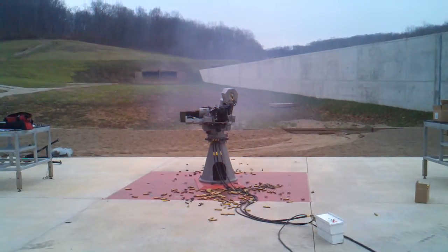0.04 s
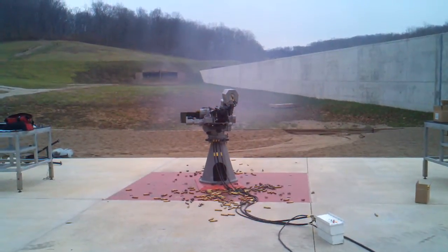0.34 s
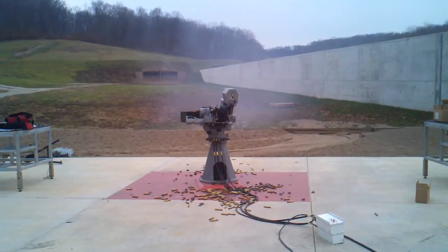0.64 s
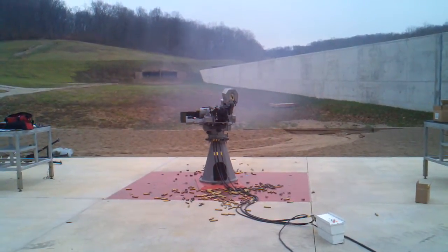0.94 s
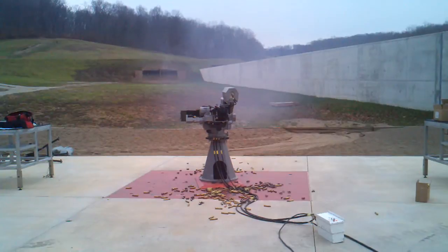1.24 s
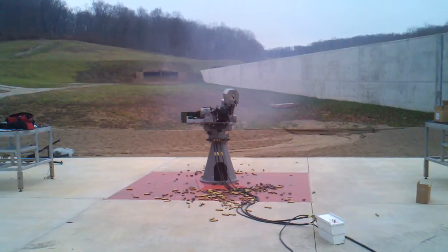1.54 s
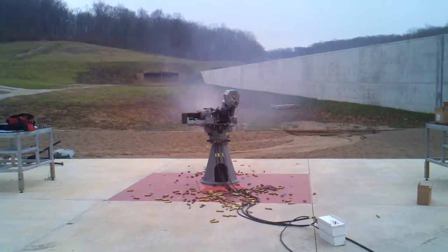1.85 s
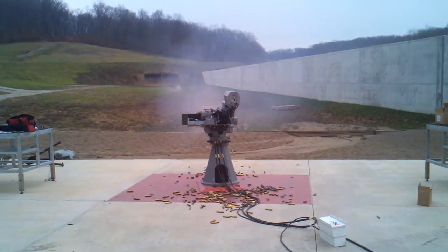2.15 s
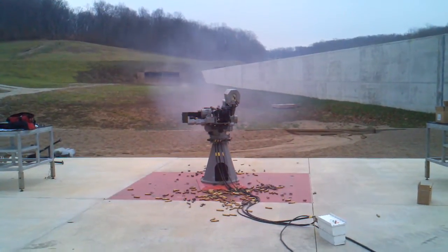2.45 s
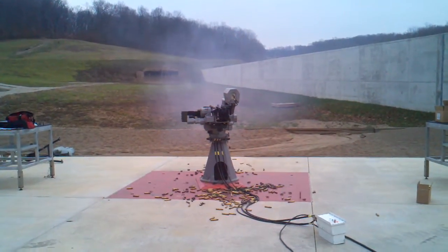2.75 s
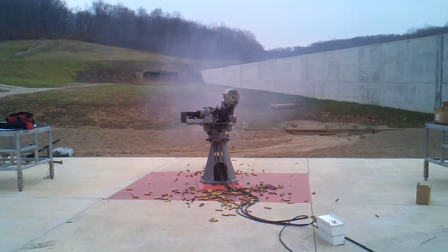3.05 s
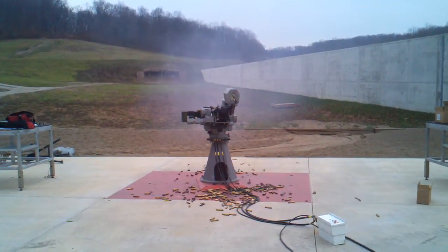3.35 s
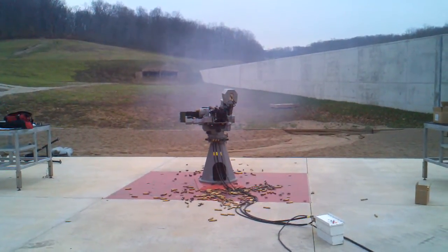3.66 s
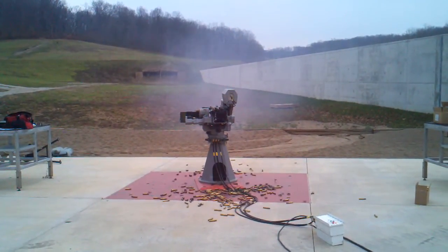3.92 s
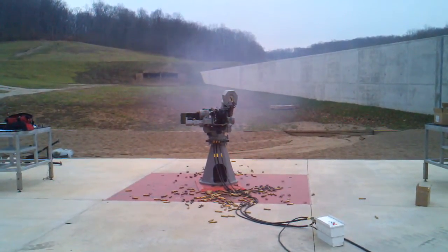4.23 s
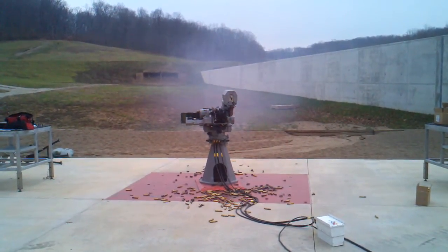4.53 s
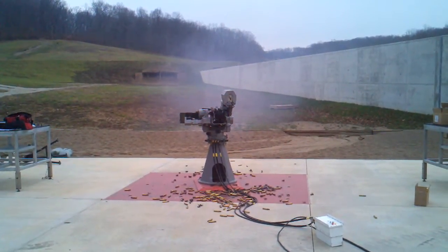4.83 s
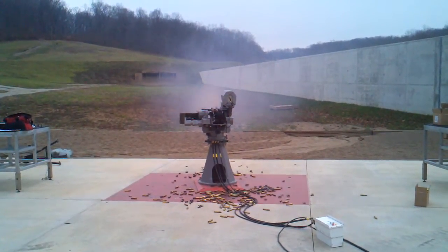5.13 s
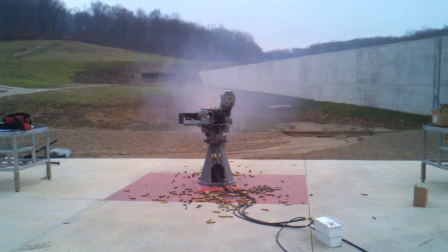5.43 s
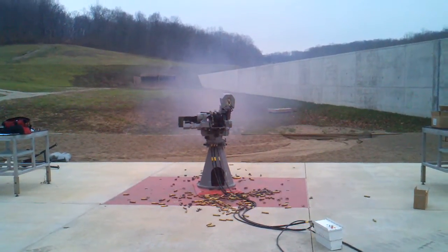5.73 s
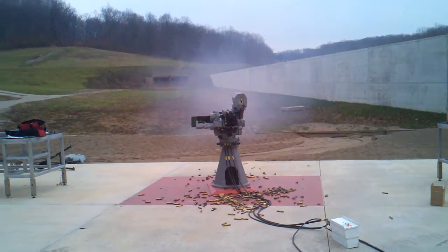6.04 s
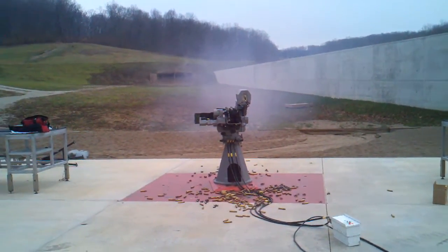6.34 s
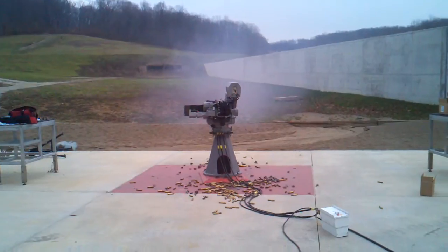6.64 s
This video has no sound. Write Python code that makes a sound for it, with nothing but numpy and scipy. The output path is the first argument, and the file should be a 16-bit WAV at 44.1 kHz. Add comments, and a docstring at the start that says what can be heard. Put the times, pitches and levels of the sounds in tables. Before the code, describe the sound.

Two loud five-round machine gun bursts at an open range, each followed by tinkling shell cases, far thuds and fading echoes.

```python
"""Outdoor range: faint air murmur and a thin whine. A heavy machine gun on a pedestal clacks and fires
five rounds; each blast cracks, then roars between the concrete pad and a long wall. The rounds thud into
a far backstop, a grassy slope answers, brass cases ring and hop on the concrete, and a wooded ridge rolls
the sound back. A second five-round burst follows about 3 s after the first. The camera's limiter
flattens both bursts and its stereo widener hollows the middle."""
import sys
import numpy as np
from scipy import signal
from scipy.fft import rfft, irfft
from scipy.io import wavfile
from scipy.ndimage import uniform_filter1d

SR = 44100
rng = np.random.default_rng(int(sys.argv[2]) if len(sys.argv) > 2 else 0)


def transcribe(u):
    """Save the signal u as a 16-bit wav file named by the first command-line argument.

    u: samples, shape (n,) or (channels, n), limited to [-1, 1]; the rate is SR.
    q: integer samples, one column per channel.
    """
    v = np.clip(np.atleast_2d(u).T, -1, 1)
    q = np.round(v * 32767).astype(np.int16)
    wavfile.write(sys.argv[1], SR, q)


N = 294588
TIME_S = np.arange(N) / SR
BIN_HZ = np.arange(N // 2 + 1) * SR / N


def from_db(db):
    """Decibels to gain."""
    return 10 ** (np.asarray(db) / 20)


def at_bins(table):
    """Table interpolated at each FFT bin, log-frequency axis."""
    hz, value = np.transpose(table)
    return np.interp(np.log(np.maximum(BIN_HZ, 1)), np.log(hz), value)


def unit_rms(x):
    """Scale to rms 1."""
    return x / np.sqrt(np.mean(x ** 2) + 1e-20)


def cut(x, hz, kind, order=2):
    """Butterworth low-pass or high-pass."""
    return signal.sosfilt(signal.butter(order, hz, kind, fs=SR, output="sos"), x)


def drift(rate_hz):
    """Smooth random curve, rms 1."""
    pole = np.exp(-2 * np.pi * rate_hz / SR)
    return unit_rms(signal.lfilter([1], [1, -2 * pole, pole * pole], rng.standard_normal(N)))


def noise(spectrum, correlation, lumps_db=0, resonances=()):
    """Coloured stereo noise, rms 1; level lumps stand for single prominent reflections."""
    peaks_db = sum(db / (1 + (2 * (BIN_HZ - hz) / width_hz) ** 2) for hz, width_hz, db in resonances)
    mid, side = rfft(rng.standard_normal((2, N))) * from_db(at_bins(spectrum) + peaks_db)
    alike = np.clip(at_bins(correlation), -1, 1)
    pair = np.sqrt(1 + alike) * mid + np.sqrt(1 - alike) * side * [[1], [-1]]
    return unit_rms(irfft(pair, N) * from_db(lumps_db * drift(36)))


def ring(drive, hz, t60_s):
    """One mode: a unit click starts a decaying sine of height 1."""
    pole = from_db(-60 / (t60_s * SR))
    angle = 2 * np.pi * hz / SR
    return signal.lfilter([0, np.sin(angle)], [1, -2 * pole * np.cos(angle), pole * pole], drive + 1e-18)


def thumps(starts_s, levels_db, low_hz, high_hz):
    """Blows through a broad resonance, a few cycles each."""
    blows = np.zeros(N)
    blows[(starts_s * SR).astype(int)] = from_db(levels_db)
    band = signal.butter(2, [low_hz, high_hz], "band", fs=SR, output="sos")
    return signal.sosfilt(band, blows + 1e-18) * SR / (np.pi * (high_hz - low_hz))


def puffs(starts_s, levels_db, rise_s, t60_s):
    """Envelope of blows that rise and decay; powers add."""
    power = np.zeros(N)
    for start_s, db in zip(starts_s, levels_db):
        start = int(start_s * SR)
        age_s = TIME_S[:N - start][:SR]
        blow = from_db(db - 60 * age_s / t60_s) * np.minimum(age_s / rise_s, 1)
        power[start:start + len(age_s)] += blow ** 2
    return np.sqrt(power)


# left/right likeness of far sound: freq_hz, correlation
FAR_STEREO = [(60, 0.45), (170, 0.37), (600, 0.53), (1500, .1), (4000, 0.079), (10000, 0.1)]
# air spectrum: freq_hz, density_db
AIR_SPECTRUM = [(25, -32.5), (50, -34.5), (100, -2.5), (160, 0.5), (400, 3), (650, -1), (900, -6.5),
                (1200, -12.5), (1800, -20), (3000, -26), (5500, -33), (9000, -27), (14000, -31)]
# whine tones: pitch_hz, rms_db
WHINE_TONES = [(8861, -84), (9076, -82), (9119, -107), (9372, -79.5)]


def background():
    """Distant murmur of air and a thin, wavering whine."""
    whine = sum(from_db(db) * unit_rms(ring(rng.standard_normal(N), hz, t60_s=0.12))
                for hz, db in WHINE_TONES)
    return from_db(-54.5) * noise(AIR_SPECTRUM, FAR_STEREO, lumps_db=0.6) + whine


# feed and bolt clacks: start_s, level_db
ACTION_CLACKS = [(1.668, -56), (1.701, -52), (1.742, -52), (1.771, -33.5), (1.787, -21), (4.907, -47),
                 (4.924, -30), (4.931, -14)]
# steel receiver resonances: centre_hz, width_hz, gain_db
RECEIVER_MODES = [(1400, 430, 15.5), (3200, 180, 9.5), (3870, 200, 11), (6440, 900, 10), (8900, 900, 11)]
# clack and muzzle crack spectrum: freq_hz, density_db
CRACK_SPECTRUM = [(40, 12.5), (150, -6), (600, 4.5), (1500, -2), (3500, 0.5), (5000, -7), (8000, -3.5),
                  (14000, -2.5)]
# left/right likeness of sound from ahead: freq_hz, correlation
AHEAD_STEREO = [(100, 0.97), (1500, 0.34), (8000, 0.47)]


def gun_action():
    """Feed and bolt move before each burst and ring the receiver."""
    clacks = puffs(*np.transpose(ACTION_CLACKS), rise_s=0.00038, t60_s=0.03)
    return clacks * noise(CRACK_SPECTRUM, AHEAD_STEREO, resonances=RECEIVER_MODES)


# rounds fired: start_s, blast_db, extra_crack_db
ROUNDS = [(1.792, 0, 2), (1.902, -1.5, -2), (2.011, 0, -0.5), (2.122, -3, 3), (2.24, -2.5, -3.5),
          (4.933, -1, 1.5), (5.046, 0, -2), (5.151, -2.5, 1.5), (5.276, -3, -1.5), (5.412, -2.5, -4)]
# left/right likeness of the blast: freq_hz, correlation
BLAST_STEREO = [(60, -1.065), (170, -0.68), (330, -0.22), (600, 0.38), (1200, -0.2), (3000, -0.021),
                (8000, -0.01)]


def muzzle_crack():
    """A broadband crack leaves the muzzle with each round."""
    start_s, blast_db, extra_crack_db = np.transpose(ROUNDS)
    cracks = puffs(start_s, blast_db + extra_crack_db - 2, rise_s=0.0054, t60_s=0.2)
    return cracks * noise(CRACK_SPECTRUM, BLAST_STEREO, lumps_db=3.5)


def after_shots(db, rise_s, t60_s, hold_s=0, delay_s=0):
    """Rise-hold-decay envelope set off by every round; powers add."""
    age_s = TIME_S - delay_s
    decay_db = 60 * np.maximum(age_s - rise_s - hold_s, 0) / t60_s
    response = np.clip(age_s / rise_s, 0, 1) * from_db(db - decay_db)
    start_s, blast_db, _ = np.transpose(ROUNDS)
    shots = np.zeros(N)
    shots[(start_s * SR).astype(int)] = from_db(blast_db)
    power = signal.fftconvolve(shots ** 2, response ** 2)[:N]
    return np.sqrt(np.maximum(power, 0))


# roar spectra by band: freq_hz, density_db
ROAR_BASS_SPECTRUM = [(20, -24), (50, -14), (90, -4.5), (130, -3), (180, 3.5), (260, -1), (340, 3),
                      (520, -19), (1200, -62)]
ROAR_MID_SPECTRUM = [(120, -53), (220, -18.5), (310, -1.5), (430, 3), (600, 1), (850, -3.5), (1300, -3),
                     (2000, -4.5), (3000, -10.5), (4500, -22), (9000, -28.5)]
ROAR_TREBLE_SPECTRUM = [(1000, -24.5), (2200, -31), (3400, 2.5), (5000, -1), (7500, 4.5), (10000, 2.5),
                        (14000, -3.5)]
# firing point resonances: centre_hz, width_hz, gain_db
SITE_MODES = [(179.4, 27, 3.5), (266.4, 17, 7), (425.4, 33, 4), (757.6, 17, 6), (805, 40, 4),
              (906, 28, 5.5), (1124, 7.1, 3.5), (1687, 28, 2), (3440, 59, 1), (6500, 36, 3.5)]


def roar(slap_delay_s=0.121, top_hz=10000):
    """The blast between pad and wall dies fast; the wall slaps back and the range rings on."""
    start_s, blast_db, _ = np.transpose(ROUNDS)
    blast = after_shots(0, rise_s=0.015, t60_s=0.34, hold_s=0.029)
    slap = puffs(start_s + slap_delay_s, blast_db - 9, rise_s=0.0043, t60_s=0.11)
    bass = np.hypot(from_db(-10) * blast, after_shots(-11, rise_s=0.051, t60_s=1.13))
    mid = np.hypot(from_db(-5.5) * blast, after_shots(-15, rise_s=0.051, t60_s=1.707))
    treble = after_shots(-15.5, rise_s=0.0073, t60_s=0.66, hold_s=0.069)
    top = after_shots(-14.5, rise_s=0.0073, t60_s=0.42, hold_s=0.069)  # air absorbs the top sooner
    hiss = noise(ROAR_TREBLE_SPECTRUM, BLAST_STEREO, resonances=SITE_MODES)
    bass_noise = noise(ROAR_BASS_SPECTRUM, BLAST_STEREO, lumps_db=1.5, resonances=SITE_MODES)
    mid_noise = noise(ROAR_MID_SPECTRUM, BLAST_STEREO, lumps_db=1.5, resonances=SITE_MODES)
    return (bass * bass_noise
            + np.hypot(mid, slap) * mid_noise
            + treble * cut(hiss, top_hz, "low", order=3)
            + top * cut(hiss, top_hz, "high", order=3))


# strong wall echoes: start_s, level_db
WALL_ECHOES = [(1.926, -2.5), (2.275, -26), (2.366, -5.5), (5.398, -13), (5.543, -7.5), (5.613, -20)]


def wall_echoes():
    """Single reflections off the wall arrive as low thumps."""
    return thumps(*np.transpose(WALL_ECHOES), low_hz=290, high_hz=400)


# rounds landing: start_s, boom_db, knock_db, crack_db
BACKSTOP_HITS = [(2.529, -16.5, -12.5, -19.5), (2.656, -18.5, -27, -36), (2.765, -29, -18, -13),
                 (2.873, -24.5, -31, -37.5), (2.994, -23, -24.5, -42), (5.697, -18.5, -33, -30),
                 (5.793, -16, -10, -18), (5.937, -27, -7.5, -17.5), (6.015, -20, -25, -42),
                 (6.171, -22.5, -24, -41)]
# spectra of the impact and the trap's hollow: freq_hz, density_db
IMPACT_SPECTRUM = [(150, -25), (400, -3.5), (900, -2), (1500, 8.5), (2100, -5.5), (3500, -12.5),
                   (7000, -21), (14000, -40.5)]
HOLLOW_SPECTRUM = [(60, -46), (110, -22), (145, -3.5), (175, 4.5), (215, -2), (300, -12), (600, -62)]


def backstop(echo_delay_s=0.0415, air_cutoff_hz=7000):
    """Rounds clack on the trap's steel plate, spray earth and boom in its hollow; air dulls it all."""
    start_s, boom_db, knock_db, crack_db = np.transpose(BACKSTOP_HITS)
    boom = thumps(start_s, boom_db, low_hz=143, high_hz=200)
    knock = thumps(start_s, knock_db, low_hz=227, high_hz=314)
    plate = thumps(start_s + 0.00095, crack_db - 1, low_hz=1100, high_hz=1430)
    crack = puffs(start_s, crack_db, rise_s=0.002, t60_s=0.045)
    spray = puffs(start_s - 0.008, crack_db - 15, rise_s=0.00095, t60_s=0.32)
    rumble = puffs(start_s - 0.025, np.full(len(start_s), -29), rise_s=0.0065, t60_s=0.59)
    hit = (boom + knock + plate
           + np.hypot(crack, spray) * noise(IMPACT_SPECTRUM, AHEAD_STEREO, lumps_db=-0.5)
           + rumble * noise(HOLLOW_SPECTRUM, AHEAD_STEREO))
    reflected = from_db(-10) * hit + from_db(-9) * plate  # the wall favours the clack
    echo = np.pad(reflected, ((0, 0), (int(echo_delay_s * SR), 0)))[:, :N]
    return cut(hit + echo, air_cutoff_hz, "low")


# hill echo spectra by band: freq_hz, density_db
HILL_BASS_SPECTRUM = [(30, -55), (70, -18.5), (120, 0.5), (165, 4), (240, -2), (400, -47)]
HILL_LOW_SPECTRUM = [(120, -55), (260, -2), (420, 5.5), (600, -10.5), (1000, -73), (2500, -66)]
HILL_MID_SPECTRUM = [(250, -12), (550, 4), (800, 2), (1100, -2.5), (1800, -5), (2600, -18), (3600, -25),
                     (5000, -106), (9000, -53)]
# ridge echo resonance: centre_hz, width_hz, gain_db
RIDGE_MODES = [(790, 340, 5)]


def hills():
    """A near grassy slope, then a far wooded ridge, return a dull, smeared roll without deep bass."""
    slope_low = after_shots(-41.5, rise_s=0.25, t60_s=1.7, delay_s=0.74)
    slope_mid = after_shots(-46.5, rise_s=0.25, t60_s=5.4, delay_s=0.74)
    ridge = after_shots(0, rise_s=0.21, t60_s=6.2, delay_s=1.49)
    roll = (from_db(-45.5) * ridge * noise(HILL_BASS_SPECTRUM, FAR_STEREO)
            + np.hypot(from_db(-50.5) * ridge, slope_low) * noise(HILL_LOW_SPECTRUM, FAR_STEREO)
            + from_db(-46) * ridge * noise(HILL_MID_SPECTRUM, FAR_STEREO, resonances=RIDGE_MODES)
            + slope_mid * noise(HILL_MID_SPECTRUM, FAR_STEREO))
    return cut(roll, 63, "high")


# brass case modes: pitch_hz, level_db, t60_s
BRASS_MODES = [(4900, -17, 2.1), (5720, -20, 2), (6130, -11, 1.2), (6060, -10.5, 0.36), (6374, 0, 0.41),
               (6440, -2, 0.34), (6880, -10.5, 0.63), (7160, -16, 0.82), (8430, -15, 0.75),
               (8700, -9, 0.55), (8900, -10, 0.64), (8860, 1, 0.44), (9275, -9, 0.52), (9830, -11.5, 0.31),
               (10939, -8, 0.64), (11700, -3.5, 0.17), (11530, -4, 0.55), (11600, -2, 0.32),
               (12000, -9, .35), (13000, -15, .6)]


def case_hops(fall_s=0.75, first_hop_s=0.2, hop_ratio=0.89, landing_db=-40.5, loss_db=2, contacts=14):
    """Each round's case falls, then hops lower and quicker. Rows: start_s, level_db, favoured_hz."""
    hop = np.arange(contacts)
    shape = (len(ROUNDS), contacts)
    hop_s = first_hop_s * hop_ratio ** (hop - 1) * np.exp(0.15 * rng.standard_normal(shape))
    flight_s = np.where(hop == 0, fall_s, hop_s)
    start_s = np.array(ROUNDS)[:, :1] + np.cumsum(flight_s, axis=1)
    level_db = landing_db - loss_db * hop + 3 * rng.standard_normal(shape)
    favoured_hz = rng.choice(np.array(BRASS_MODES)[:, 0], shape)  # new contact point each hop
    return np.stack([start_s, level_db, favoured_hz], axis=-1)[start_s < TIME_S[-1]]


# loudest clinks on the concrete: start_s, level_db, favoured_hz
CASE_CLINKS = [(2.576, -26, 8900), (2.6394, -35, 8820), (2.829, -27.5, 6360), (2.8564, -41, 6340),
               (2.9193, -30, 6500), (2.9672, -29, 6640), (3.1248, -31, 8730), (3.2136, -31.5, 6410),
               (3.3129, -37.5, 6460), (3.3412, -31, 8700), (3.3894, -32, 6400), (3.5359, -43.5, 8740),
               (3.6396, -34.5, 10900), (3.6945, -37.5, 11700), (4.0127, -48, 11500), (4.2238, -48.5, 11300),
               (4.4294, -51, 11600), (5.915, -28.5, 8800), (6.0182, -20, 8970), (6.0496, -26, 9000),
               (6.1068, -38, 8900), (6.213, -38.5, 9000), (6.2995, -32.5, 8600), (6.3729, -34.5, 8960),
               (6.5685, -40, 6350), (6.6114, -32, 11000)]


def brass_cases(ring_db=-12, tick_db=-25, uneven_db=3, off_mode_db_per_octave=-17, detune=0.00309):
    """Each contact ticks and rings two detuned cases, most in the modes the contact point favours."""
    start_s, level_db, favoured_hz = np.vstack([CASE_CLINKS, case_hops()]).T
    starts = (start_s * SR).astype(int)
    ticks = puffs(start_s, level_db + tick_db, rise_s=0.0005, t60_s=0.045) * rng.standard_normal((2, N))
    # tumbling sweeps each case's radiation lobes past the microphones
    tumble = [from_db(2.16 * drift(28)) for _ in range(2)]
    tuning = 1 + detune * np.array([-1, 1]) * rng.uniform(0.427, 1.5, (len(BRASS_MODES), 2))
    scatter = rng.standard_normal((len(start_s), len(BRASS_MODES), 2, 3))
    ringing = np.zeros((2, N))
    for mode, (hz, mode_db, t60_s) in enumerate(BRASS_MODES):
        struck_db = level_db + off_mode_db_per_octave * np.abs(np.log2(hz / favoured_hz))
        for case in range(2):
            strength = from_db(struck_db + ring_db + mode_db + uneven_db * scatter[:, mode, case, 0])
            channel_gains = 0.54 + 0.5 * scatter[:, mode, case, 1:].T
            clicks = np.zeros((2, N))
            clicks[:, starts] = strength * channel_gains * (-1) ** (mode + case)
            ringing += ring(clicks, hz * tuning[mode, case], t60_s) * tumble[case]
    return cut(ringing + ticks, 4460, "high", order=6)  # the cases are heard only above about 4.5 kHz


def scene():
    """Stereo sum of all sources."""
    gun = gun_action() + muzzle_crack() + roar() + wall_echoes()
    return background() + gun + backstop() + hills() + brass_cases()


def limiter(x, threshold_db=-9.5, release_db_per_s=330, attack_s=0.0028):
    """Gain takes milliseconds to drop, so a burst's first round overshoots; recovery is slower."""
    power = uniform_filter1d(np.mean(x ** 2, axis=0), size=330)
    level_db = 10 * np.log10(np.maximum(power, 1e-12))
    release_db = release_db_per_s * TIME_S
    held_db = np.maximum.accumulate(level_db + release_db) - release_db
    excess_db = np.maximum(held_db - threshold_db, 0)
    pole = np.exp(-1 / (attack_s * SR))
    return x * from_db(-signal.lfilter([1 - pole], [1, -pole], excess_db))


# opposite channel subtracted: freq_hz, share
WIDENER_CROSSFEED = [(200, 0), (600, .25), (1000, .75), (1300, 1), (4000, 1), (5200, .45), (7000, .12),
                     (13000, .15)]


def widener(x, lag_s=0.000381):
    """Each channel loses a late copy of the other, combing middle and side in turn."""
    share = at_bins(WIDENER_CROSSFEED)
    spectra = rfft(x)
    late_opposite = np.exp(-2j * np.pi * BIN_HZ * lag_s) * spectra[::-1]
    return irfft((spectra - share * late_opposite) / np.sqrt(1 + share ** 2), N)


def record(dry):
    """Limiter, widener, overload, steep top cut."""
    overloaded = np.clip(widener(limiter(dry)), -1, 1)
    cutoff_hz = 13950
    return signal.sosfilt(signal.ellip(12, 0.2, 70, cutoff_hz, fs=SR, output="sos"), overloaded)


dry = scene()
out = record(dry)
transcribe(out)
```